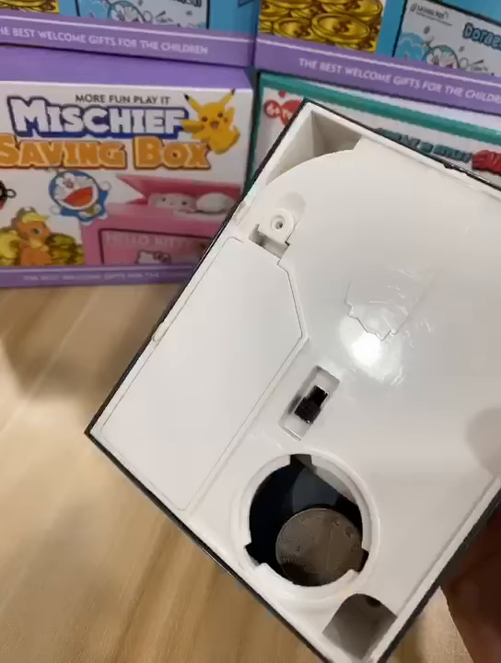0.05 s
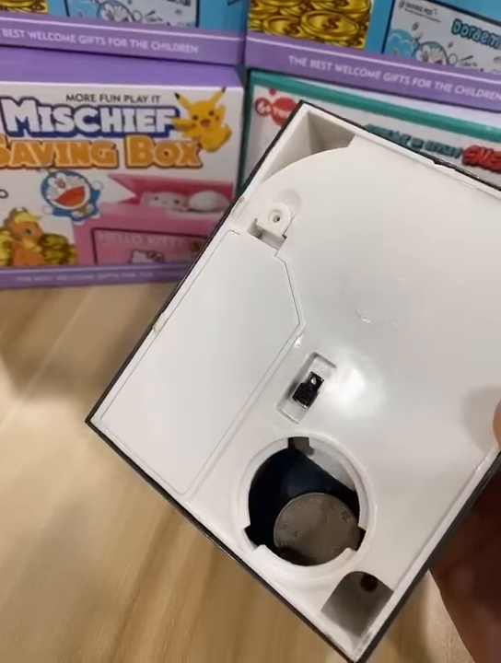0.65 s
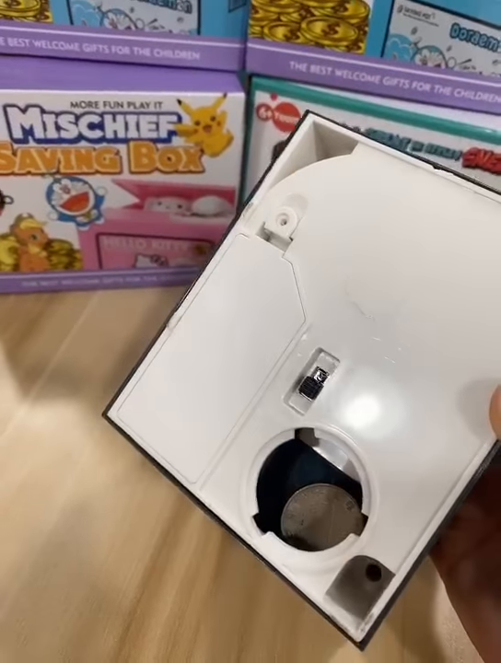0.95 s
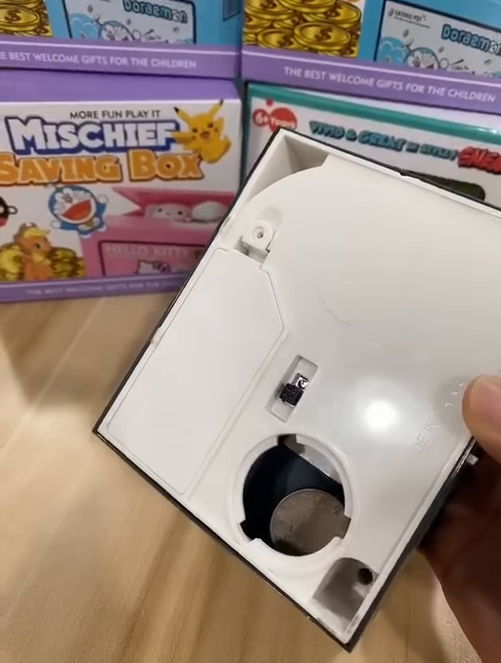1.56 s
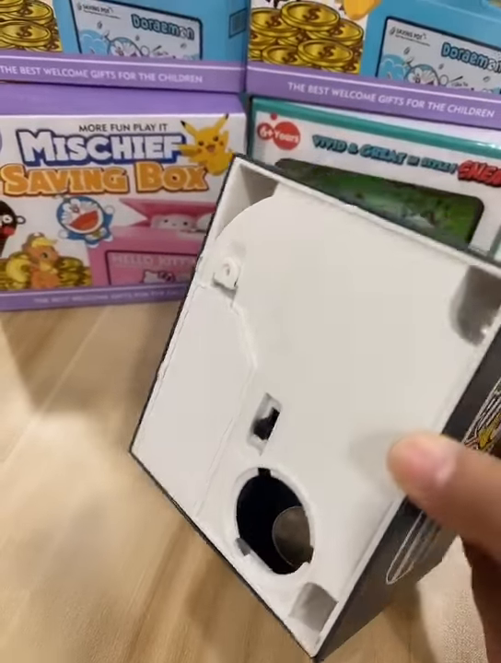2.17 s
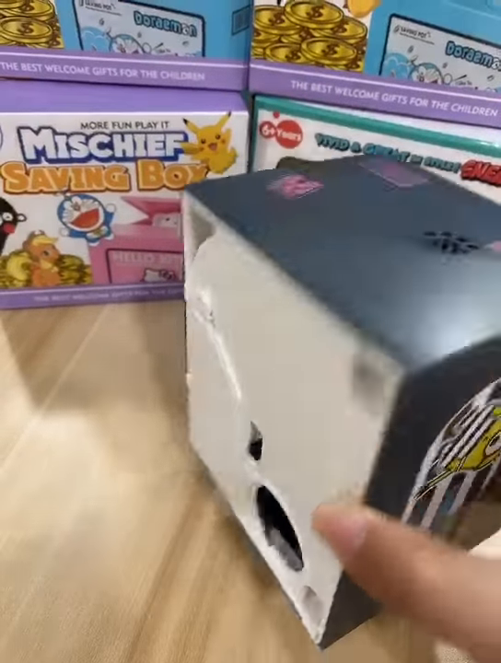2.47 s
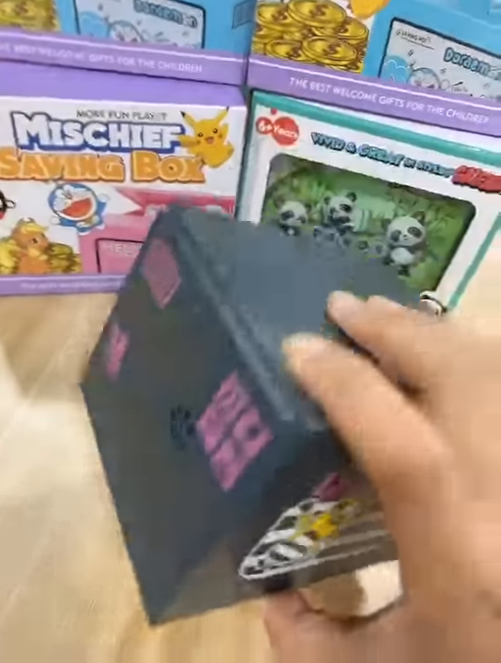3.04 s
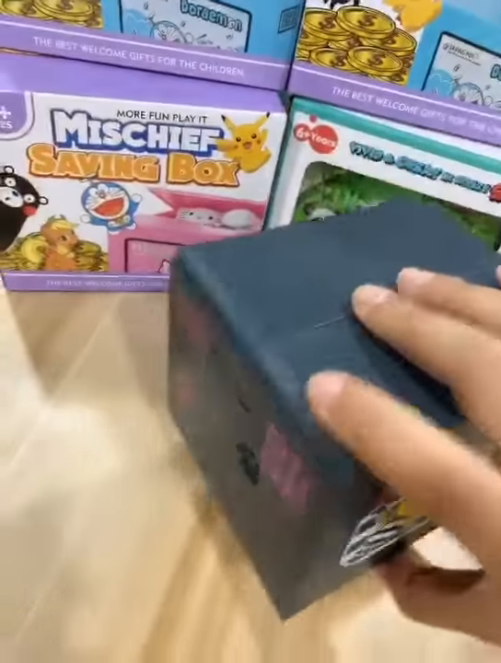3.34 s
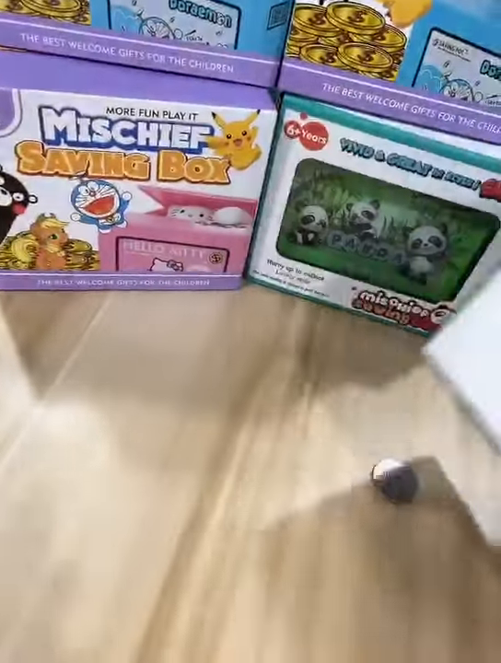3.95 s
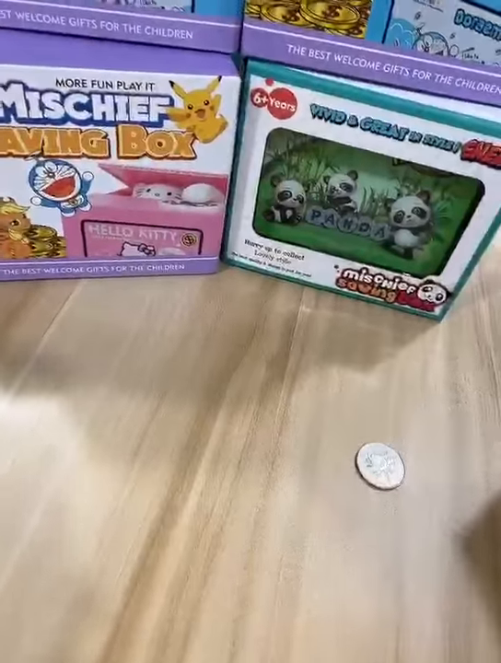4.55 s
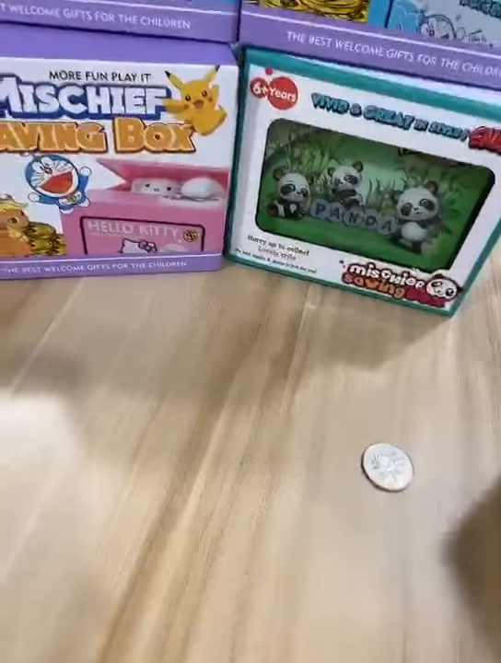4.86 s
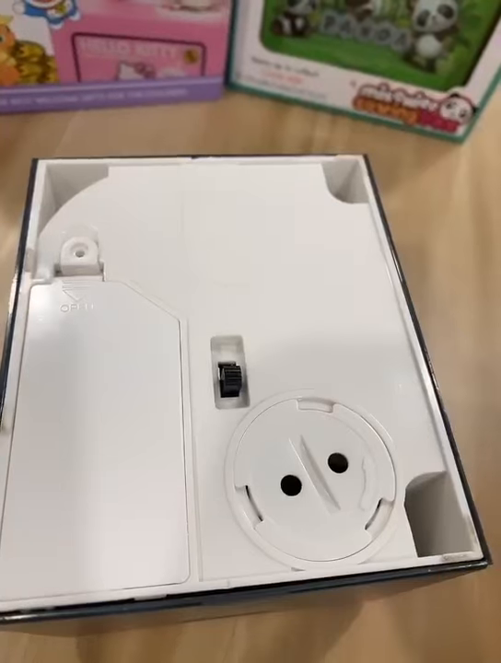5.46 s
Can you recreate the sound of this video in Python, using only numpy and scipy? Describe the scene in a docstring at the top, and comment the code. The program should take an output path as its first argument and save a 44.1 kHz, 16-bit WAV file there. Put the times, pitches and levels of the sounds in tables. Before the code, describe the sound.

Over a low ventilation hum, a coin knocks around in a hollow plastic box, then falls out, rattling and settling on wood.

```python
"""Coin out of a money box

A bare room humming with ventilation, the microphone close to a wooden table. A coin clacks inside
a plastic money box as the box is turned over, slides, and drops out on the wood. It bounces, ringing
thinly, then wobbles on its rim faster and faster until it lies flat. Lifting the box away stirs the
air at the microphone. The sound drops out once near the end."""
import sys
import numpy as np
from scipy import signal
from scipy.fft import rfft, irfft
from scipy.io import wavfile
from scipy.ndimage import uniform_filter1d

SR = 44100
rng = np.random.default_rng(int(sys.argv[2]) if len(sys.argv) > 2 else 0)


def master_out(mix):
    """Clip the mix to full scale and print it as 16-bit PCM to the path in sys.argv[1]."""
    frames = np.transpose(np.atleast_2d(mix))
    ceiling = np.clip(frames, -1, 1)
    pcm = np.round(ceiling * 32767).astype(np.int16)
    wavfile.write(sys.argv[1], SR, pcm)


N = 242991

# the coin knocking inside the box: start_s, level_db, sharpness_hz
KNOCKS = [(2.5506, -19, 9430), (2.5538, -23, 1716), (2.5645, -23.5, 2590), (2.5850, -29, 3404),
          (2.5862, -16.5, 6970), (2.6012, -23.5, 1798), (2.6152, -25, 4500), (2.6255, -32, 2450),
          (2.6310, -25, 1492)]
# its light bumps as it slides: start_s, level_db, sharpness_hz
BUMPS = [(2.906, -41, 1800), (2.9349, -35, 1700), (2.9681, -29, 3640), (2.9890, -31.5, 1500),
         (3.0400, -39, 1105)]
# its bounces on the table, crisper as the hops get lower: start_s, level_db, sharpness_hz
BOUNCES = [(3.0969, -10.5, 2600), (3.1294, -14, 3200), (3.1947, -14, 6000), (3.2166, -13, 6900),
           (3.2365, -17, 7900), (3.2761, -18.5, 5700), (3.303, -16, 8720), (3.3182, -15.5, 9700),
           (3.3373, -22.5, 8060), (3.3672, -19.5, 5820), (3.3826, -19, 10400), (3.3943, -17, 11960),
           (3.4129, -22, 8860), (3.4342, -16.5, 9260), (3.445, -16.5, 13900), (3.4548, -19, 7400),
           (3.4712, -24.5, 6700), (3.4869, -25, 7080), (3.4957, -23, 14200), (3.5185, -33, 8500),
           (3.5294, -22, 8500), (3.5355, -27, 9470), (3.549, -31, 8900), (3.562, -25.5, 7100),
           (3.571, -33, 9200)]
# modes of the wooden table: pitch_hz, level_db, t60_s
TABLE_MODES = [(370, -19, 0.032), (780, -21, 0.013), (1190, -3.5, 0.017), (1420, -5.5, 0.016),
               (1750, 2.8, 0.009), (2230, 2.3, 0.011), (2800, 2, 0.01), (3280, .5, 0.011),
               (4000, 3.7, 0.007), (5090, 1, 0.008), (5620, 4.6, 0.008), (6330, 0, 0.008),
               (7050, -2.5, 0.007), (8400, -4, 0.007)]
# spectrum of the crack of contact on wood: frequency_hz, level_db
WOOD_CRACK = [(80, -27.5), (300, -17.5), (850, -15), (1200, -11), (1650, 9), (2100, 3), (3000, 4.5),
              (4500, 6), (5600, -1.5), (7000, -5.5), (8600, -3.5), (11000, -7.5), (14000, -18)]


def amp(db):
    """Decibels to gain."""
    return 10 ** (np.asarray(db) / 20)


def unit_rms(x):
    """Scales to rms 1."""
    return x / np.sqrt(np.mean(x ** 2) + 1e-20)


def value_at(points, hz):
    """Reads a table along a log-frequency axis."""
    frequency_hz, value = np.transpose(points)
    return np.interp(np.log(hz + 1), np.log(frequency_hz + 1), value)


def add(mix, start_s, sound):
    """Mixes a sound in at start_s."""
    part = mix[round(start_s * SR):][:len(sound)]
    part += sound[:len(part)]


def coloured(x, spectrum):
    """Filters x by rows of frequency_hz, level_db and scales it to rms 1."""
    gain = amp(value_at(spectrum, np.fft.rfftfreq(len(x), 1 / SR)))
    return unit_rms(irfft(rfft(x) * gain, len(x)))


def softened(x, hz):
    """Takes off treble with two gentle low-passes."""
    pole = np.exp(-2 * np.pi * hz / SR)
    return signal.lfilter([(1 - pole) ** 2], [1, -2 * pole, pole * pole], x)


def swell(start_s, attack_s, hold_s, release_s, top_db, rise_db):
    """The four corners of a rise, hold and fall: times_s, levels_db."""
    times_s = start_s + np.cumsum([0, attack_s, hold_s, release_s])
    return times_s, top_db - rise_db * np.array([1, 0, 0, 1])


def taps(curve, jitter, spread_db, max_taps=90):
    """An uneven run of contacts following rows of time_s, taps_per_s, level_db, sharpness_hz."""
    times, rate, db, hz = np.transpose(curve)
    contacts, now = [], times[0]
    for late, force in rng.standard_normal((max_taps, 2)):
        if now < times[-1]:
            level_db = np.interp(now, times, db) + spread_db * force
            contacts.append((now, level_db, np.interp(now, times, hz)))
        now += np.exp(jitter * late) / np.interp(now, times, rate)
    return contacts


def strikes(contacts, modes, crack_spectrum, crack_db, crack_t60_s, tick_db, vary_db, low_cut_hz):
    """Each contact ticks, cracks, and rings the struck body's modes according to the spot it hits."""
    length, max_contacts = 4096, 128
    t = np.arange(length) / SR
    hz, db, t60 = np.transpose(modes)[:, :, None]
    polarity = (-1) ** np.arange(len(modes))[:, None]
    decays = polarity * amp(db - 60 * t / t60)
    low_cut = signal.butter(2, low_cut_hz, "highpass", fs=SR)
    spots = rng.standard_normal((max_contacts, 2, len(modes)))
    noises = rng.standard_normal((max_contacts, length))
    out = np.zeros(N)
    for (start_s, level_db, sharpness_hz), white, (share, detune) in zip(contacts, noises, spots):
        pitch_hz = hz * (1 + .022 * detune[:, None])
        body = amp(vary_db * share) @ (decays * np.sin(2 * np.pi * pitch_hz * t))
        noise = coloured(white, crack_spectrum)
        crack = noise * amp(crack_db - 60 * t / crack_t60_s)
        # the rim stops dead: brief and bright
        tick = unit_rms(np.gradient(noise)) * amp(tick_db) * np.exp(-(t / .00065) ** 2)
        blow = softened(body + crack + tick, sharpness_hz)  # a longer contact leaves less treble
        blow = signal.lfilter(*low_cut, blow)
        rms = np.sqrt(np.sum(blow ** 2) / (.005 * SR))  # as if spread over 5 ms
        add(out, start_s, amp(level_db) * blow / rms)
    return out


def ventilation():
    """Room tone: a steady low rush of air with a few wavering drones."""
    # spectrum of the rush: frequency_hz, level_db
    rush = [(20, -21), (33, -15), (50, -7), (75, 8), (170, 0.5), (340, -1.5), (470, -10), (700, -18),
            (1400, -20.5), (2400, -27), (3300, -32.5), (5000, -41.5), (8000, -47.5), (14000, -55.5)]
    # droning bands of noise: centre_hz, width_hz, level_db
    drones = [(49, 4, -44.5), (130.1, 9.4, -43.5), (191.3, 28, -44.5), (305, 0.86, -55), (2130, 580, -63)]
    hz = np.fft.rfftfreq(N, 1 / SR)
    out = amp(-41) * coloured(rng.standard_normal(N), rush)
    for centre_hz, width_hz, level_db in drones:
        band = rfft(rng.standard_normal(N)) / (1 + ((hz - centre_hz) / width_hz * 2) ** 2)
        out += amp(level_db) * unit_rms(irfft(band, N))
    return out


def money_box():
    """Fingers tick on hollow plastic; inside, the coin knocks, then catches its way along the wall."""
    # faint finger ticks: start_s, level_db
    handling = [(0.557, -59), (2.4050, -61)]
    # modes of the hollow box: pitch_hz, level_db, t60_s
    box_modes = [(350, -10, 0.077), (430, 1, 0.066), (816, -10, 0.024), (1200, -7, 0.05),
                 (1460, -18, 0.027), (1940, -10, 0.037), (2345, -4, 0.035), (2750, 2, 0.012),
                 (3700, -10, .012), (4550, 5, .0045), (5250, 2.5, 0.0045)]
    # spectrum of the crack of contact on plastic: frequency_hz, level_db
    plastic_crack = [(200, -15), (500, -5), (1100, 10), (2400, 9), (3400, 4.5), (4600, 7.5), (5500, 3),
                     (6300, -6.5), (10000, -6), (14000, -12)]
    # spectrum of the coin's face rasping on plastic: frequency_hz, level_db
    rasp = [(300, -22), (700, -23.5), (1020, 12), (1400, 1), (1750, 12.5), (2700, 5.5), (4500, 1),
            (5200, 5.5), (7000, -9.5), (14000, -3)]
    finger_sharpness_hz, catch_sharpness_hz, catches_per_s = 11900, 1595, 710
    fingers = [(s, db, finger_sharpness_hz) for s, db in handling]
    slide = swell(start_s=2.905, attack_s=.014, hold_s=.049, release_s=.02, top_db=-44, rise_db=9.5)
    curve = [(s, catches_per_s, db, catch_sharpness_hz) for s, db in zip(*slide)]
    catches = taps(curve, jitter=.27, spread_db=2.5)
    clacks = strikes(KNOCKS + fingers, box_modes, plastic_crack, crack_db=9.5, crack_t60_s=.019,
                     tick_db=-1.5, vary_db=2, low_cut_hz=250)
    scrape = strikes(BUMPS + catches, box_modes, rasp, crack_db=21.5, crack_t60_s=.043,
                     tick_db=9, vary_db=12.5, low_cut_hz=500)
    return clacks + scrape


def coin_ring(contacts, ring_db, t60_s):
    """Two close bending modes beat; contacts top them up and share the energy out anew."""
    # the coin's bending modes: pitch_hz, level_db
    coin_modes = [(12413, 0), (12487, -2)]
    bare_rim_hz, db_per_octave = 10500, 1.5  # sharper contacts ring it more
    on_edge_s, on_edge_width_s, on_edge_db = 3.255, .031, 16.5  # freest while it tumbles on edge
    vary_db, max_contacts = 2.5, 128
    t = np.arange(N) / SR
    times, contact_db, sharpness_hz = np.transpose(sorted(contacts))
    kick_db = contact_db + ring_db + db_per_octave * np.log2(sharpness_hz / bare_rim_hz)
    kick_db += on_edge_db * np.exp(-((times - on_edge_s) / on_edge_width_s) ** 2)
    last_contact = np.maximum(np.searchsorted(times, t) - 1, 0)
    fall_db_per_s = 60 / t60_s
    # a kick takes over only if it is louder than what still rings
    strongest_db = np.maximum.accumulate(kick_db + fall_db_per_s * times)[last_contact]
    level_db = strongest_db - fall_db_per_s * np.maximum(t, times[0])
    share, jolt = rng.standard_normal((2, max_contacts, len(coin_modes)))
    phase_turn = np.exp(1j * np.cumsum(jolt, axis=0))[last_contact]
    envelopes = amp(level_db[:, None] + vary_db * share[last_contact]) * phase_turn
    envelopes = uniform_filter1d(envelopes * (t > times[0])[:, None], size=40, axis=0)
    hz, db = np.transpose(coin_modes)
    return np.sum(amp(db) * envelopes * np.exp(2j * np.pi * hz * t[:, None]), axis=1).real


def slip_hiss():
    """The coin's face hisses thinly on the plastic from the moment it starts to slip."""
    # spectrum of the hiss: frequency_hz, level_db
    hiss = [(1500, -28.5), (5000, -0.5), (9000, 1.5), (14000, 1.5)]
    corners = swell(start_s=2.8, attack_s=.13, hold_s=.08, release_s=.11, top_db=-63.5, rise_db=9)
    level_db = np.interp(np.arange(N) / SR, *corners, left=-np.inf, right=-np.inf)
    return amp(level_db) * coloured(rng.standard_normal(N), hiss)


def coin_on_table(contacts):
    """The rim strikes wood: a dry crack and a short ring from the table."""
    return strikes(contacts, TABLE_MODES, WOOD_CRACK, crack_db=4, crack_t60_s=.008,
                   tick_db=6, vary_db=2, low_cut_hz=298)


def with_reflections(clicks):
    """Each click is thrown back by the box held above the table, then by the walls."""
    # first reflections: delay_s, level_db, dulled_above_hz
    reflections = [(.00225, -3, 3300), (.0095, -18, 4000), (.0151, -20, 5000), (.0400, -23, 5000)]
    out = clicks.copy()
    for delay_s, level_db, dulled_above_hz in reflections:
        add(out, delay_s, amp(level_db) * softened(clicks, dulled_above_hz))
    return out


def draught():
    """A soft low push of air at the microphone as the box is lifted away."""
    # spectrum of the push: frequency_hz, level_db
    rumble = [(20, -27), (48, 14.5), (60, -2), (120, -20.5), (500, -76)]
    corners = swell(start_s=3.394, attack_s=.24, hold_s=.36, release_s=.21, top_db=-38.5, rise_db=44.5)
    level_db = np.interp(np.arange(N) / SR, *corners)
    return amp(level_db) * coloured(rng.standard_normal(N), rumble)


def wobble_contacts(points=12):
    """The rim taps quicker, lighter and duller as the coin sinks flat."""
    start_s, end_s, fade_db_per_s = 3.576, 3.768, 17
    times = np.linspace(start_s, end_s, points)
    taps_per_s = np.geomspace(75, 205, points)
    level_db = -33 - fade_db_per_s * (times - start_s)
    sharpness_hz = np.geomspace(6700, 3700, points)
    return taps(np.column_stack([times, taps_per_s, level_db, sharpness_hz]), jitter=.2, spread_db=1.8)


def settling_ticks(sharpness_hz=15000):
    """The edge ticks crisply on the wood as the coin settles."""
    # the last touches: start_s, level_db
    last_ticks = [(3.7360, -43), (3.7486, -44), (3.7838, -40)]
    contacts = [(s, db, sharpness_hz) for s, db in last_ticks]
    return strikes(contacts, TABLE_MODES, WOOD_CRACK, crack_db=25, crack_t60_s=.008,
                   tick_db=6, vary_db=1, low_cut_hz=7000)


def room(x, tail_db, early_db, early_t60_s):
    """Quick scatter from things nearby, then a diffuse tail whose treble dies first."""
    # decay of the bare room: frequency_hz, t60_s
    decay = [(200, 3), (1000, 1.12), (2500, 1.2), (5000, 1.0), (9000, 0.7), (12000, 0.5)]
    # colour of its tail: frequency_hz, level_db
    colour = [(150, -11), (500, -1), (850, -6.5), (1200, -1.5), (1750, -2), (2350, 1.5), (2900, -2.5),
              (3600, -2), (4600, -6), (6500, -.5), (8300, -3), (12500, -3.5)]
    hz, frame_s, bands = signal.stft(rng.standard_normal(SR), SR, nperseg=256)
    band_db = value_at(colour, hz)[:, None] - 60 * frame_s / value_at(decay, hz)[:, None]
    tail = signal.istft(bands * amp(band_db), SR, nperseg=256)[1][:SR]
    t = np.arange(SR) / SR
    tail *= np.clip(t / .024, 0, 1) ** 2  # builds over 24 ms
    early = softened(rng.standard_normal(SR), hz=3800) * (t > .003) * amp(-60 * t / early_t60_s)
    echo = amp(tail_db) * tail / np.linalg.norm(tail) + amp(early_db) * early / np.linalg.norm(early)
    return signal.fftconvolve(x, echo)[:N]


def scene():
    """Box, coin and table close to one microphone, with the room behind them."""
    wobble = wobble_contacts()
    box = money_box() + slip_hiss()
    table = coin_on_table(BOUNCES + wobble)
    settling = settling_ticks()
    # the coin rings on in the air and is choked where it keeps touching
    ring = coin_ring(KNOCKS + BUMPS, ring_db=-34, t60_s=.14)
    ring += coin_ring(BOUNCES, ring_db=-22, t60_s=.26)
    ring += coin_ring(wobble, ring_db=-15, t60_s=.06)
    reverb = room(box, tail_db=-14, early_db=-16, early_t60_s=.18)
    reverb += room(table + amp(-12) * ring, tail_db=-5, early_db=-18, early_t60_s=.04)
    return (box + with_reflections(table) + settling + ring + reverb + ventilation() + draught())[None]


def record(dry):
    """Rounds off the loudest clicks, mutes two short stretches and cuts the top treble."""
    # stretches with no sound: start_s, end_s
    silences = [(0, .018), (4.926, 5.106)]
    ceiling, band_limit_hz = .75, 14100
    rounded = dry / (1 + (dry / ceiling) ** 4) ** .25
    t, live = np.arange(N) / SR, np.ones(N)
    for start_s, end_s in silences:
        live[(t >= start_s) & (t < end_s)] = 0
    gated = rounded * uniform_filter1d(live, size=64)
    low_pass = signal.firwin(511, band_limit_hz, window=("kaiser", 9), fs=SR)
    return signal.oaconvolve(gated, low_pass[None], "same")


dry = scene()
out = record(dry)
master_out(out)
```